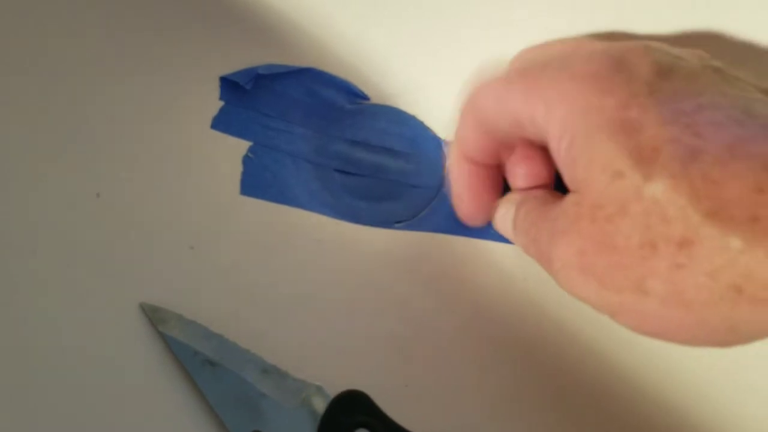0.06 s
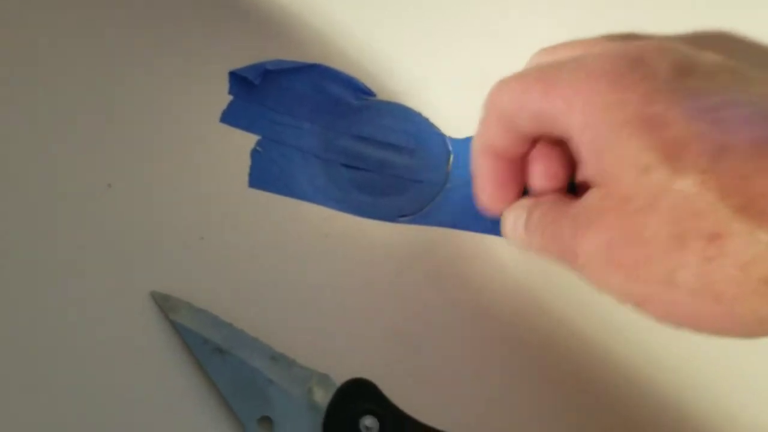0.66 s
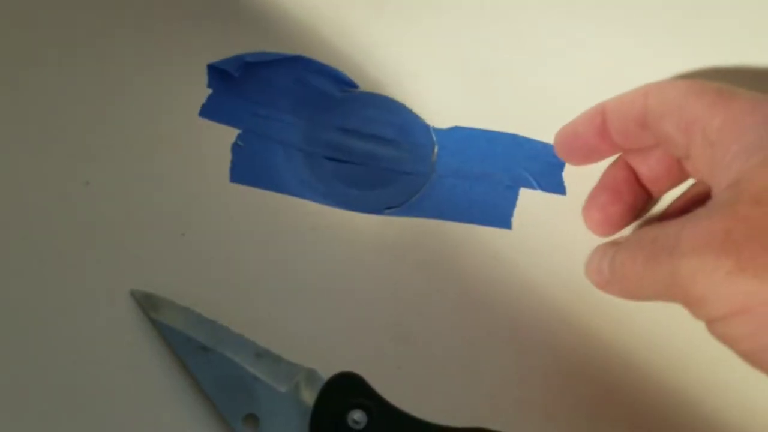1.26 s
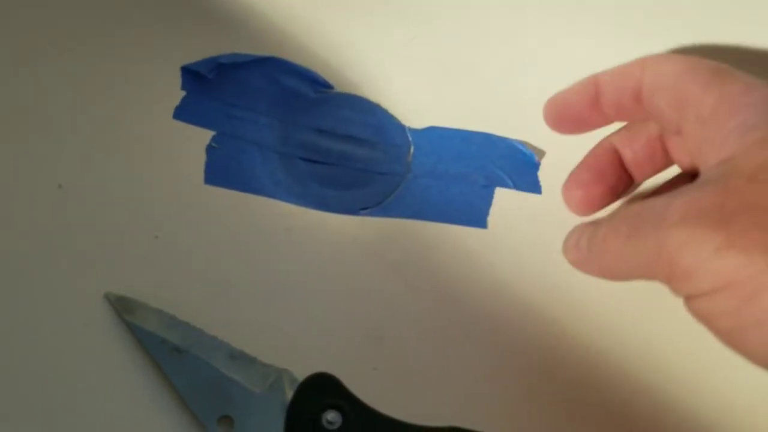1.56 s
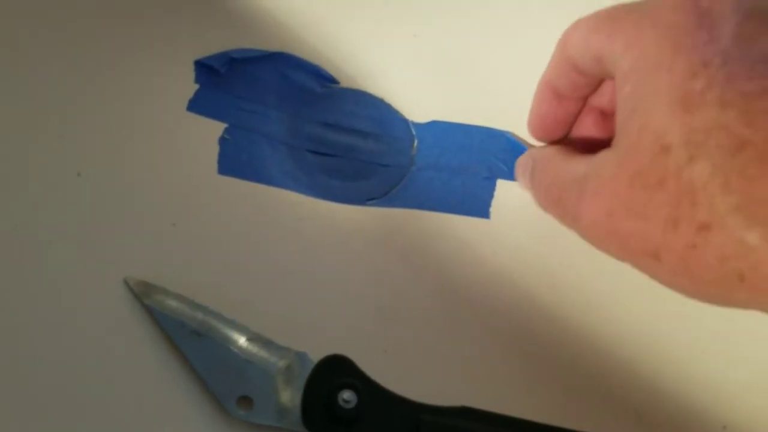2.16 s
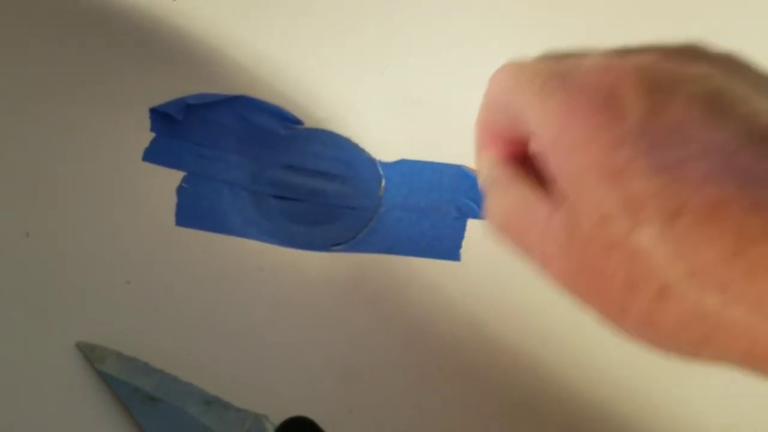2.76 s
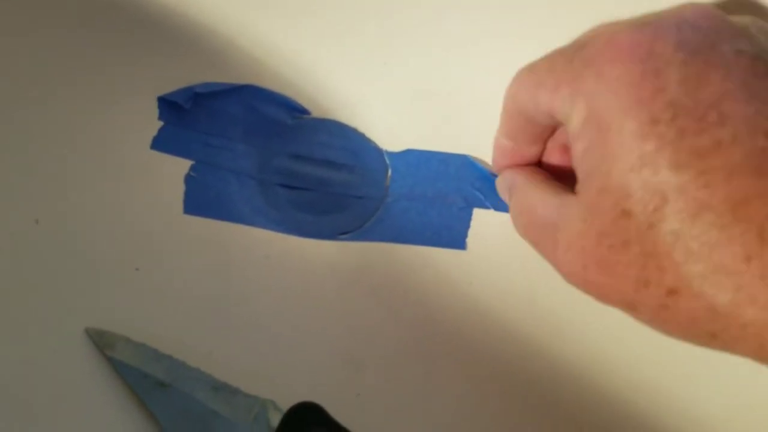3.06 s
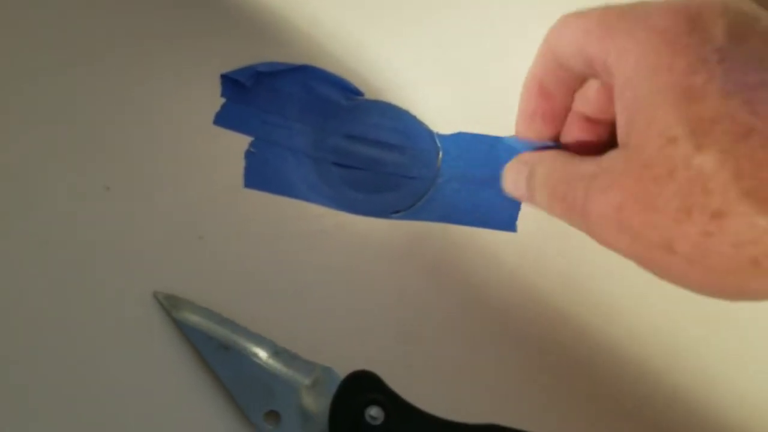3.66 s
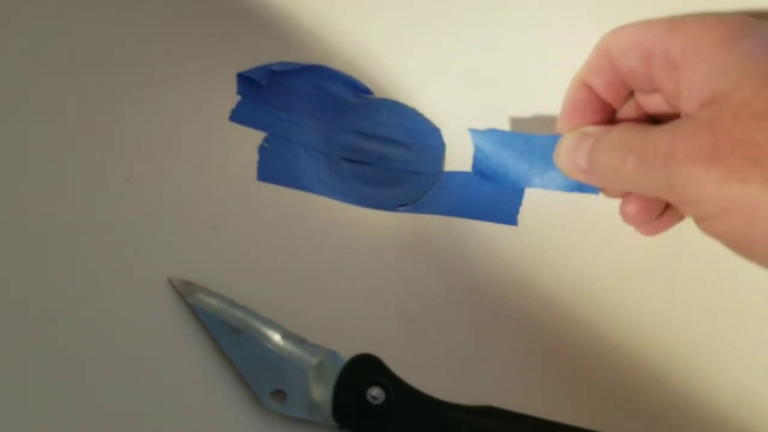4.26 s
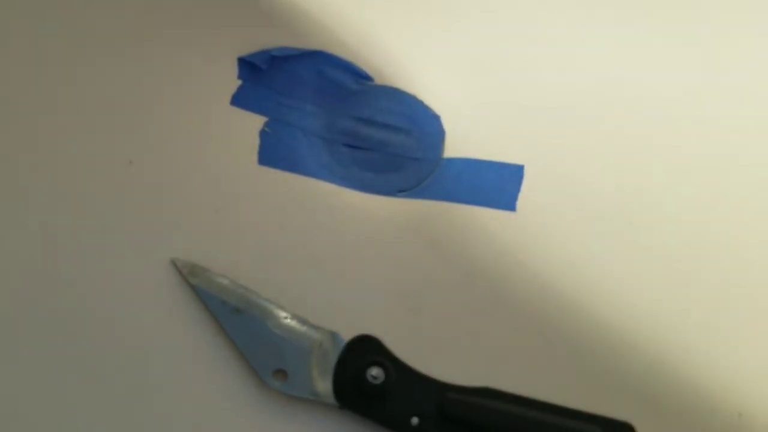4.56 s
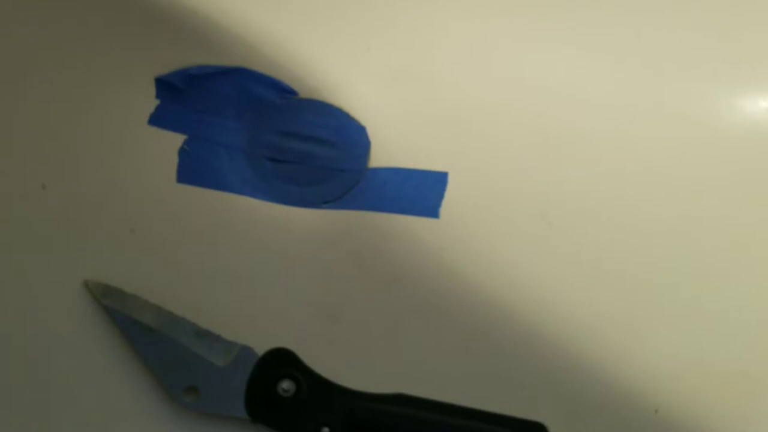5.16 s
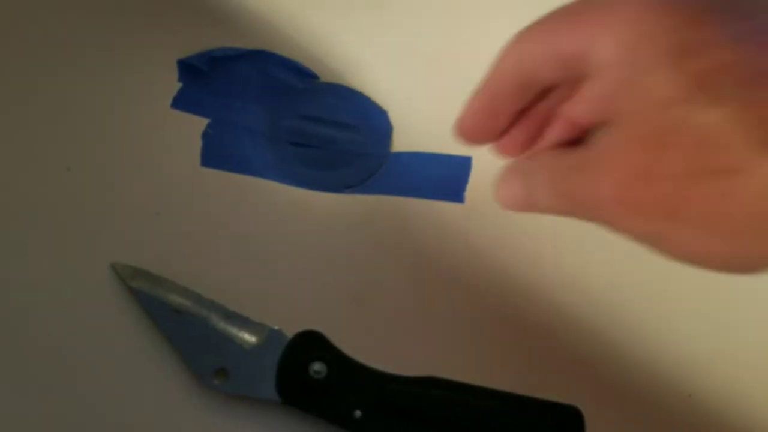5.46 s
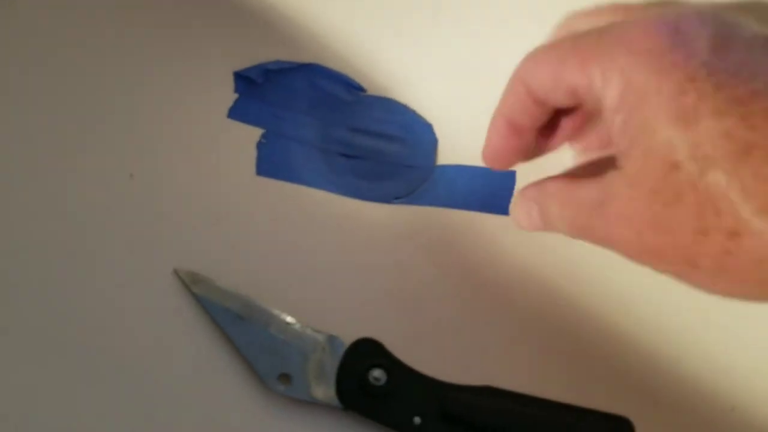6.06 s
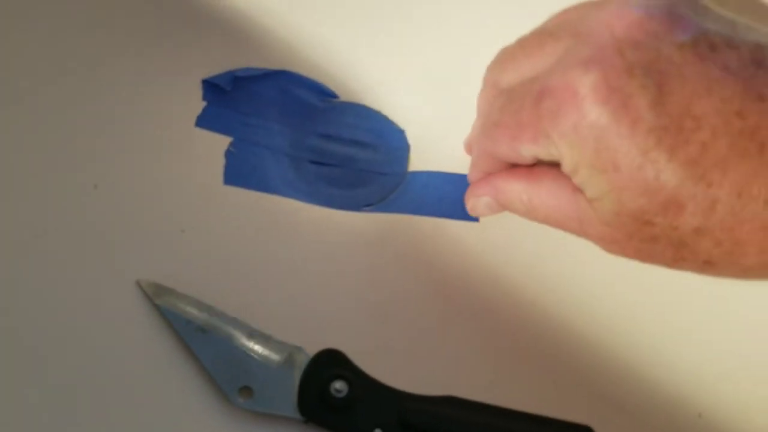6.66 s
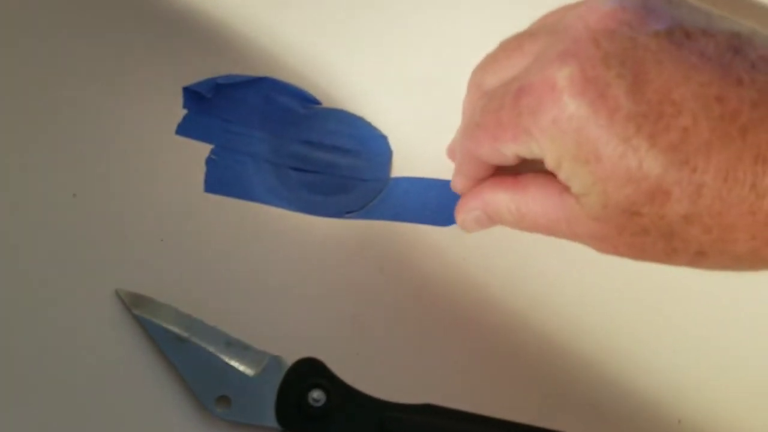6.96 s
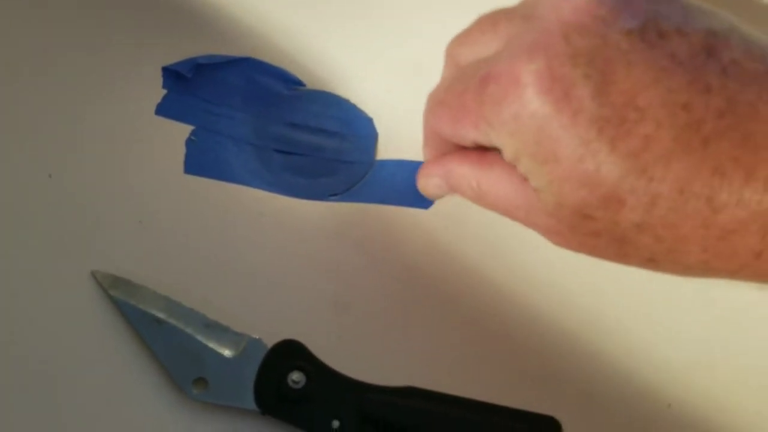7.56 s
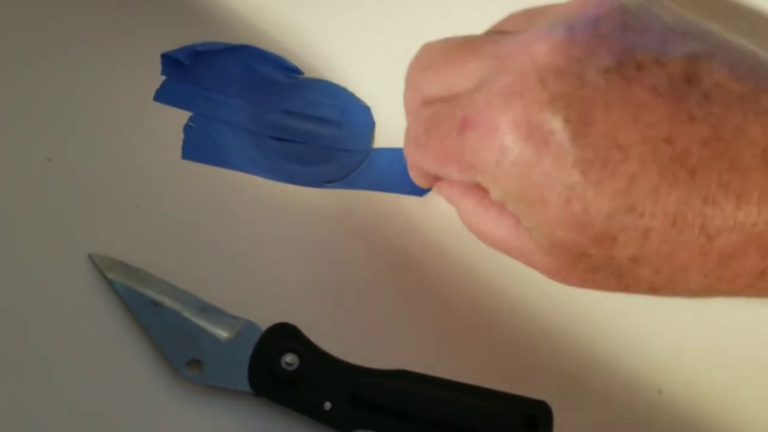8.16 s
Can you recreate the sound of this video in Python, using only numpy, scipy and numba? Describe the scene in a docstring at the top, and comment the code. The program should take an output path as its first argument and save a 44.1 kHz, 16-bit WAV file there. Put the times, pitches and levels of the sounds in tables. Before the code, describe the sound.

Close by in a small room, fingers tap a sink and a knife rings briefly. Fingernails pick at masking tape with scattered ticks and rubs. About halfway, the tape peels in two short, crackling pulls and rips free. Light picking, knocks and scrapes on the basin follow. Faint distant traffic, wavering engine drones, hiss and electrical hum lie underneath.

```python
"""Masking tape on a sink is picked at with fingernails, close by, then peels off in two pulls and rips free.
Glue threads fracture in a dense crackle and excite the lifted span of paper, whose resonance falls as
it lengthens. Fingers knock and scrape the basin, exciting its modes; a knife rings briefly at the start.
A small room reverberates, over far traffic and gliding engine drones, hiss and mains hum.
Two microphone ports, left and right, pick up the sound."""
import sys
import numpy as np
from scipy import signal
from scipy.fft import rfft, irfft
from scipy.io import wavfile
from numba import njit

SR = 44100
rng = np.random.default_rng(int(sys.argv[2]) if len(sys.argv) > 2 else 0)


def wav_record(signal):
    """Record a signal, one row per channel, as 16-bit PCM in the file named by sys.argv[1]."""
    frames = np.transpose(np.atleast_2d(signal))
    bounded = np.clip(frames, -1, 1)
    # unit amplitude maps onto the largest positive 16-bit level
    quanta = np.round(bounded * 32767).astype(np.int16)
    wavfile.write(sys.argv[1], SR, quanta)


N = 370440
T = np.arange(N) / SR
BLOW_S = .004  # a click's level is its rms over this time
# spectrum of glue and nail ticks: (frequency [Hz], relative level [dB])
TICK_SPECTRUM = [(300, -31), (1000, -5), (3000, -14), (5500, 3.5), (7500, -7.5), (9000, 1.5), (11500, 6),
                 (14000, 3.5), (16000, 6)]


def tape():
    """Stick-slip peeling: the glue yields unevenly; each fracture ticks and excites the lifted span."""
    effort, span_hz = peel()
    slips = unit(amp(1.92 * walk(210)))
    fractures = crackle(rate=2400, spread_db=2.5) * slips * effort
    threads = crackle(rate=12000, spread_db=1.5)
    picks = picking()
    picked = bursts(picks, threads, column=3, crack=3.5)
    # the freed strip flaps once: (time [s], rise [s], fall [s], level [dB])
    flap = bursts([(4.007, .0077, .0077, -41)], threads, column=3)
    body = span(fractures, span_hz, width_hz=1340, rustle_db=-35)
    body += span(picked, curves(picks)[-1], width_hz=1200, rustle_db=-8.5)
    body += span(flap, np.full(N, 1450.), width_hz=780, rustle_db=-22)
    # the right port hears the span mostly by way of the basin wall
    body = np.array([body, .65 * body + .75 * diffuse(body, decay_s=.002, delay_s=.0002)])
    # a short span fizzes more, and fizz grows as a power of effort
    reference_hz, reference_db, db_per_octave = 2940, -45, 30.5
    fizz_db = -53 + db_per_octave * np.log2(span_hz / reference_hz)
    fizzing = slips * amp(fizz_db) * (effort / amp(reference_db)) ** .68
    # the peel line is wide: the ports share part of its treble, a little apart in time
    shared, own = (fizz(fizzing, picks) for port in range(2))
    treble = np.array([shared, .5 * np.roll(shared, 2) + .85 * own])
    return room(body, room_db=-14.5, decay_s=.035) + room(treble, room_db=-15, decay_s=.049)


def peel():
    """Resonance falls with length: the harder the pull, the faster the span grows and its note sinks."""
    # effort of each pull: (time [s], level [dB])
    first_pull = [(3.215, -81), (3.29, -54), (3.342, -40.5), (3.356, -32), (3.378, -42.5), (3.396, -36.5),
                  (3.422, -63.5), (3.51, -49), (3.545, -78)]
    second_pull = [(3.62, -73), (3.735, -55), (3.78, -37.5), (3.83, -51), (3.875, -45.5), (3.945, -48),
                   (4.008, -30), (4.026, -54), (4.06, -78)]
    first_hz, second_hz = (3470, 2400), (2940, 2480)  # resonance at the grip, and its lower limit
    sag_share = .33  # share of the peeled length that holds most of the fall
    effort, hz = np.zeros(N), np.full(N, float(first_hz[0]))
    for pull, (grip_hz, limit_hz) in [(first_pull, first_hz), (second_pull, second_hz)]:
        begun = T > pull[0][0]
        force = amp(curves(pull)[0]) * (begun & (T < pull[-1][0]))
        peeled = np.cumsum(force) / force.sum()
        hz = np.where(begun, limit_hz + (grip_hz - limit_hz) * np.exp(-peeled / sag_share), hz)
        effort += force
    return effort, hz


def picking():
    """Fracture starts abruptly, friction swells: both as time-ordered rows with a rise and a fall."""
    # glue snapping loose, or the tape ticking under a tapping finger (1.346 and 1.705 s): (time [s], decay [s],
    # span level [dB], fizz level [dB], resonance [Hz])
    glue_snaps = [(1.346, .0017, -48.5, -52, 2450), (1.705, 0.0037, -42, -51, 2930),
                  (2.351, 0.0014, -40, -56, 2970), (2.6442, 0.0044, -40.5, -63, 3430),
                  (3.3468, 0.0031, -27, -44, 3330), (3.3899, .0044, -33, -59, 2880),
                  (3.522, .0025, -42, -52, 2640), (3.7522, .0017, -26.5, -43, 3020),
                  (4.0007, 0.003, -36, -50, 2220), (4.0175, 0.0025, -64, -33.5, 4400),
                  (4.897, 0.0071, -52.5, -58, 2600), (4.913, .007, -69, -51.5, 3955),
                  (5.0138, 0.002, -57, -44.5, 3043), (6.92, .008, -54.5, -55.5, 2980),
                  (7.5894, .003, -51, -42.5, 3484), (7.605, 0.0027, -44.5, -38, 3150),
                  (7.6773, .0029, -60, -51.5, 3480)]
    # tape rubbed: (time [s], rise and fall [s], span level [dB], fizz level [dB], resonance [Hz])
    tape_rubs = [(.56, 0.018, -52.5, -66, 2410), (.8, .08, -88, -72.5, 3500),
                 (1.315, 0.015, -64, -74, 3200), (1.66, 0.041, -70, -80, 4200),
                 (1.92, .025, -70, -87, 3680), (2.08, .04, -68, -82, 3680), (2.635, 0.019, -58, -57, 3440),
                 (3.648, .005, -50.5, -72, 3076), (4.012, 0.0044, -31.5, -42.5, 3000),
                 (4.37, .025, -76, -70.5, 3200), (4.665, .024, -94, -69.5, 3980),
                 (4.99, 0.065, -72, -66.5, 3400), (5.076, 0.0042, -55.5, -42.5, 2800),
                 (5.46, 0.0065, -60.5, -82, 2698), (6.045, .035, -66, -72, 3040),
                 (6.904, 0.0072, -56, -59, 3210)]
    attack_s = .00054
    snaps = [(s, attack_s, *rest) for s, *rest in glue_snaps]
    rubs = [(s, length, length, *rest) for s, length, *rest in tape_rubs]
    return sorted(snaps + rubs)


def span(x, hz, width_hz, rustle_db):
    """Forced vibration: the lifted paper rings in one steep resonance and rustles around it."""
    # rustle of paper: (frequency [Hz], relative level [dB])
    paper_spectrum = [(100, -21), (700, -16.5), (1400, -33), (2500, -13), (4400, 14), (5200, -4),
                      (6500, -2.5), (9000, -36), (16000, -10)]
    width = float(width_hz)
    ring = resonance(resonance(x + 1e-18, hz, width), hz, width)
    power_gain = np.sqrt(2 * SR / (np.pi * width))
    return ring * power_gain + amp(rustle_db) * colour(x, paper_spectrum)


def fizz(envelope, picks):
    """Brief impulses reach high frequencies: single glue threads tick in each pull, snap and rub."""
    ticks = crackle(rate=7100, spread_db=3) * envelope
    threads = crackle(rate=12000, spread_db=1.5)
    return colour(ticks + bursts(picks, threads, column=4, crack=4), TICK_SPECTRUM)


def basin():
    """Impact and friction: fingers knock, thud and tick on the sink and excite its normal modes."""
    # finger impacts: (time [s], knock level [dB], thud level [dB], nail level [dB])
    finger_taps = [(.006, -43.5, -43, -58.5), (0.5264, -44, -46.5, -65), (1.3442, -46, -47, -54.5),
                   (1.7009, -44, -43, -52), (2.351, -43, -70, -60), (5.6761, -55.5, -70, -71),
                   (5.7687, -44, -37.5, -68), (5.793, -33, -84, -54), (7.1998, -44.5, -46.5, -55),
                   (7.6067, -44.5, -64, -69.5)]
    # sliding nail or fingertip: (time [s], rise [s], fall [s], knock level [dB], nail level [dB])
    finger_scrapes = [(.033, 0.006, 0.0089, -47.5, -63.5), (3.09, 0.021, 0.032, -62, -87),
                      (3.53, 0.031, .017, -58.5, -77), (3.638, 0.014, 0.034, -58.5, -84),
                      (5.796, 0.001, 0.0047, -46, -66.5), (6.39, 0.011, .01, -55.5, -75),
                      (6.547, 0.018, 0.01, -51.5, -69), (6.592, 0.018, 0.0077, -49, -67.5),
                      (6.9, .01, .02, -65, -84), (7.212, 0.0039, 0.033, -70, -81),
                      (7.591, 0.00098, 0.0058, -50, -73.5)]
    # hard contact and soft finger pad: (frequency [Hz], relative level [dB])
    knock_spectrum = [(60, 2), (200, -5), (450, -4.5), (900, -2.5), (1400, -2), (1900, 1), (2500, 0.5),
                      (3400, -0.5), (4100, -9.5), (5200, -15), (8000, -27.5), (16000, -36)]
    thud_spectrum = [(30, -23), (100, 5.5), (220, -13), (320, -2), (430, -8), (700, -29), (1500, -23),
                     (4000, -67)]
    # modes of the basin: (frequency [Hz], relative level [dB], t60 [s])
    basin_modes = [(233.8, 3.5, 0.31), (270, 5, 0.12), (500.6, -7.5, 0.31), (771, -15.5, 0.39),
                   (905, -22, 0.35), (1320, -14.5, 0.3), (1438, -32, 0.15), (1720, -20, 0.29),
                   (2070, -17.5, 0.26), (2400, -18, 0.12), (2726, -37.5, 0.053), (3630, -25, 0.071)]
    blows = np.zeros((3, N))
    for s, *levels in finger_taps:
        blows[:, int(s * SR)] = amp(levels) * np.sqrt(BLOW_S * SR)
    hard, pad, nail = blows
    stick_slip = crackle(rate=2500, spread_db=4)
    contact = hard + bursts(finger_scrapes, stick_slip, column=3)
    nail_contact = nail + bursts(finger_scrapes, stick_slip, column=4)
    knock = bowl(colour(contact, knock_spectrum), echo_db=2, decay_s=.0094)
    thud = bowl(colour(pad, thud_spectrum), echo_db=1, decay_s=.028)
    tick = bowl(colour(nail_contact, TICK_SPECTRUM), echo_db=0, decay_s=.001)
    ring = convolve(amp(-7) * pad + amp(-12.5) * contact, modes(basin_modes)) / np.sqrt(BLOW_S * SR)
    return room(knock + thud, room_db=-8, decay_s=.045) + room(tick, room_db=-8, decay_s=.026) + ring


def knife():
    """Free vibration: a knife settling on the sink rings down at the start."""
    # modes of the knife: (frequency [Hz], level [dB], t60 [s])
    knife_modes = [(1200, -48, 0.24), (1230, -46.5, 0.22), (1440, -52, .25), (1740, -60, 0.43),
                   (2440, -61, .15), (2750, -58, .15)]
    return modes(knife_modes)


def bowl(x, echo_db, decay_s):
    """Early reflections between the basin walls, different at each port."""
    return np.array([x + amp(echo_db) * diffuse(x, decay_s, delay_s=.00023) for port in range(2)])


def room(x, room_db, decay_s):
    """Reverberation: a diffuse tail, different at each port, follows the direct sound."""
    ports = np.broadcast_to(x, (2, N))
    return np.array([port + amp(room_db) * diffuse(port, decay_s, delay_s=.0064) for port in ports])


def traffic():
    """Incoherent sources add in power: far traffic rumbles, and one car's tyres swell and recede."""
    # traffic picking up once: (time [s], level [dB])
    traffic_levels = [(0, -56), (2.6, -56), (3.3, -50), (7.4, -50.5), (8.4, -53.5)]
    # rumble and tyre noise: (frequency [Hz], relative level [dB])
    rumble_spectrum = [(20, -16), (32, -13.5), (45, -2.5), (80, 7), (130, -0.5), (180, -4), (270, -3.5),
                       (340, -13.5), (450, -21.5), (700, -37), (1200, -38.5), (3000, -62)]
    tyre_spectrum = [(100, -14.5), (350, 4), (650, -3), (1000, -10.5), (1600, -20.5), (4000, -21),
                     (8000, -54)]
    flow = amp(curves(traffic_levels)[0])
    passing = amp(-60.5) * swell(T - 5.92, rise_s=.2, fall_s=.92)
    shared, *own = [colour(n, rumble_spectrum, size=8192) * flow for n in rng.standard_normal((3, N))]
    tyres = np.array([colour(n, tyre_spectrum) for n in rng.standard_normal((2, N))])
    return shared + amp(-6.5) * np.array(own) + tyres * np.hypot(flow * amp(-22.5), passing)


def engines():
    """Walls transmit low frequencies best: only far engines' lowest orders arrive, wavering on the way."""
    # speed and throttle of each drone: (time [s], frequency [Hz], level [dB])
    track_a = [(0, 101, -53), (.8, 98.5, -41), (1.3, 95.5, -58.5), (2.18, 99.2, -48), (3.3, 102, -61),
               (3.55, 103, -50), (3.95, 105.7, -50), (4.33, 107.8, -39.5), (4.5, 109.3, -49),
               (5, 110.9, -44.5), (6.3, 117, -75)]
    track_b = [(0, 74.1, -59.5), (.8, 72.1, -48.5), (1.75, 68, -75), (2.2, 76.4, -45), (2.5, 80.3, -55),
               (3.1, 100.9, -40), (3.45, 106, -34.5), (3.68, 113.6, -48.5), (4.2, 121.1, -47),
               (4.6, 125, -59), (5.9, 133.9, -49), (6.45, 118, -68), (7.18, 120.7, -42.5), (7.45, 124, -65),
               (8.4, 130.9, -54)]
    track_c = [(2.6, 51.3, -73), (3, 53, -50), (4.1, 50.7, -48.5), (4.7, 47.83, -54.5), (6.5, 47, -65)]
    track_exhaust = [(2.5, 41.1, -68), (5.2, 48, -57), (5.7, 50.24, -47), (6.5, 49.04, -46),
                     (6.95, 44.8, -51), (8.4, 49.73, -53)]
    # their partials: (frequency multiple, relative level [dB])
    orders_a = [(1, -1.5), (2, -21.5), (3, -32.5)]
    orders_b = [(5 / 8, -18), (1, 0), (2, -18.5)]
    orders_c = [(3, -1.5), (6, -22)]
    orders_exhaust = [(1, 0), (5 / 3, -19), (16 / 3, -11), (22 / 3, -28.5)]
    drone = np.zeros(N)
    for track, orders in [(track_a, orders_a), (track_b, orders_b), (track_c, orders_c),
                          (track_exhaust, orders_exhaust)]:
        hz, db = curves(track)
        phase = 2 * np.pi * np.cumsum(hz * (1 + .00595 * walk(9))) / SR
        for multiple, relative_db in orders:
            waver_db = 3 * walk(5)
            drone += amp(db + relative_db + waver_db) * np.sin(multiple * phase + 2 * np.pi * rng.random())
    return np.sqrt(2) * drone


def hum():
    """Harmonic series: mains hum at multiples of 60 Hz, almost steady in level."""
    # mains harmonics: (frequency [Hz], level [dB])
    harmonics = [(120, -66), (180, -69), (240, -55.5), (300, -68), (360, -77)]
    tones = sum(amp(db) * np.sin(2 * np.pi * (hz * T + rng.random())) for hz, db in harmonics)
    return np.sqrt(2) * tones * amp(.15 * walk(1.1))


def hiss():
    """Uncorrelated noise: each port has its own hiss, and the left sinks a little at the end."""
    # hiss at each port: (frequency [Hz], relative level [dB])
    left_spectrum = [(300, -3.5), (700, -13), (1200, -5.5), (1900, 1.5), (2900, 1.5), (3300, -5.5),
                     (3800, -16), (5500, -20.5), (7000, -30.5), (9000, -32.5), (10500, -19.5),
                     (12000, -15.5), (16000, -14.5)]
    right_spectrum = [(300, 4.5), (700, 2), (1300, -4), (2500, -7), (4000, -12), (6000, -15.5),
                      (7500, -24.5), (9000, -18.5), (10500, -12), (12000, -2.5), (16000, -4)]
    fade_start_s, fade_db_per_s = 7.22, 3.5
    fade_db = fade_db_per_s * np.maximum(T - fade_start_s, 0)
    left = colour(rng.standard_normal(N), left_spectrum) * amp(-63 - fade_db)
    right = colour(rng.standard_normal(N), right_spectrum) * amp(-69.5)
    return np.array([left, right])


def crackle(rate, spread_db):
    """Poisson process: tiny fractures at random moments, many small and a few large."""
    sizes = amp(spread_db * np.minimum(rng.exponential(size=N), 4))
    return unit((rng.random(N) < rate / SR) * sizes * rng.choice([-1, 1], N))


def bursts(rows, grains, column, crack=0):
    """Amplitude modulation: grains swell and die at the level in `column`; a crack may mark the peak."""
    out = np.zeros(N)
    for row in rows:
        s, rise, fall = row[:3]
        part = slice(max(int((s - 4 * rise) * SR), 0), int((s + 5 * fall) * SR))
        shape = swell(T[part] - s, rise, fall)
        flurry = grains[part] * shape
        flurry[np.argmax(shape)] += crack
        energy = max(shape @ shape, BLOW_S * SR)
        out[part] += amp(row[column]) * flurry * np.sqrt(energy / (flurry @ flurry + 1e-6))
    return out


@njit
def resonance(x, hz, width):
    """Damped resonator: a state-variable band-pass whose centre moves."""
    y, band_state, low_state = np.empty(len(x)), 0., 0.
    for i in range(len(x)):
        tuning, damping = np.tan(np.pi * hz[i] / SR), width / hz[i]
        band = (band_state + tuning * (x[i] - low_state)) / (1 + tuning * (tuning + damping))
        band_state = 2 * band - band_state
        low_state += 2 * tuning * band
        y[i] = damping * band
    return y


def modes(table):
    """Modal superposition: the decaying partials of a struck object."""
    return sum(amp(db - 60 * T / t60) * np.sin(2 * np.pi * hz * T) for hz, db, t60 in table)


def diffuse(x, decay_s, delay_s):
    """Diffuse field: many delayed, decaying reflections average out to a flat spectrum."""
    t = T[:SR // 2]
    echoes = rng.standard_normal(len(t)) * np.exp(-t / decay_s) * (t > delay_s)
    flat = irfft(np.exp(1j * np.angle(rfft(echoes))))
    tail = flat * (t > delay_s) * np.exp(-(t / (5 * decay_s)) ** 2)
    return convolve(x, tail / np.linalg.norm(tail))


def response(points, size=2048):
    """Minimum-phase impulse response of a spectrum (frequency [Hz], level [dB])."""
    hz, db = np.transpose(points)
    bin_hz = np.arange(size // 2 + 1) * SR / size
    gain = amp(np.interp(np.log(bin_hz + 1), np.log(hz), db))
    cepstrum = irfft(np.log(gain))
    cepstrum[1:size // 2] *= 2
    cepstrum[size // 2 + 1:] = 0
    return irfft(np.exp(rfft(cepstrum)))


def colour(x, points, size=2048):
    """Spectral shaping: a flat sound takes on a spectrum and keeps its power."""
    h = response(points, size)
    return convolve(x, h / np.linalg.norm(h))


def convolve(x, h):
    """Linear filtering by an impulse response."""
    return signal.oaconvolve(x, h)[:N]


def swell(t, rise_s, fall_s):
    """Exponential growth to 1 at t = 0, then exponential decay."""
    return np.exp(np.where(t < 0, t / rise_s, -t / fall_s))


def walk(rate):
    """Random fluctuation with a spread near 1 and `rate` new values a second."""
    knots = rng.standard_normal(2048)
    return 1.202 * np.interp(T * rate, np.arange(len(knots)), knots)


def curves(rows):
    """Linear interpolation of each column over time."""
    s, *columns = np.transpose(rows)
    return [np.interp(T, s, c) for c in columns]


def amp(db):
    """Decibels to gain."""
    return 10 ** (np.asarray(db) / 20)


def unit(x):
    """Scale to rms 1."""
    return x / np.sqrt(np.mean(x ** 2))


def scene():
    """Directivity: the right port faces away and hears less midrange and more treble from the sink."""
    # response of that port: (frequency [Hz], gain [dB])
    right_port = [(100, -0.5), (600, -1.5), (1300, -4.5), (2400, -11.5), (4400, -11), (6500, -1), (9000, 5),
                  (11000, 7.5), (13000, 7), (16000, 4.5)]
    left, right = tape() + basin() + knife()
    near = np.array([left, convolve(right, response(right_port))])
    return near + traffic() + hiss() + hum() + engines()


def record(dry):
    """Band limiting: the recorder's steep low-pass cuts the highest treble."""
    cutoff_hz = 15850
    return signal.sosfilt(signal.ellip(10, .2, 70, cutoff_hz, fs=SR, output="sos"), dry)


dry = scene()
out = record(dry)
wav_record(out)
```